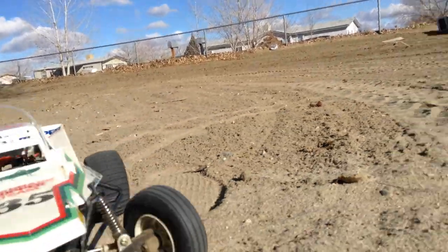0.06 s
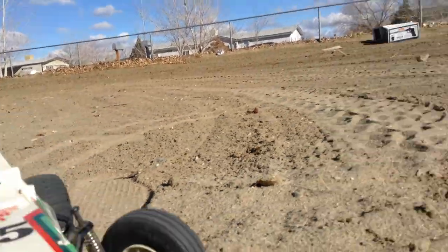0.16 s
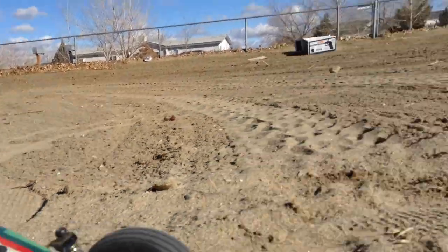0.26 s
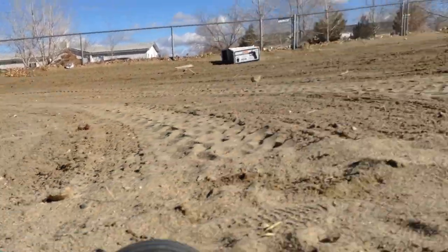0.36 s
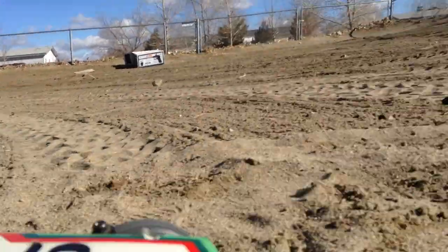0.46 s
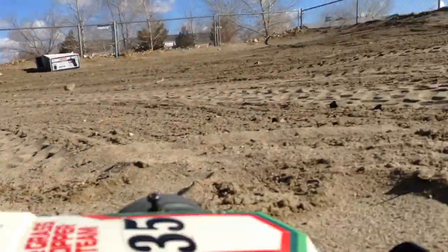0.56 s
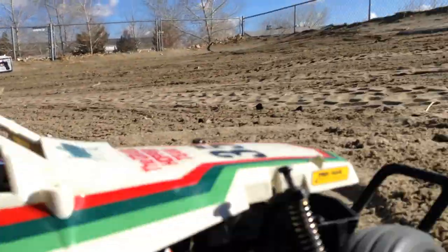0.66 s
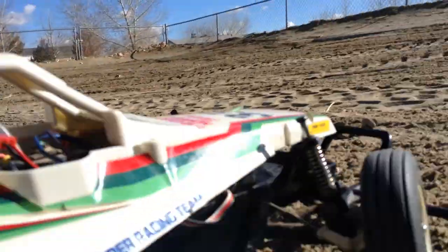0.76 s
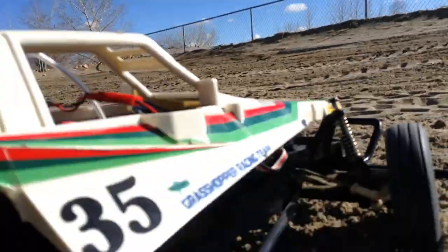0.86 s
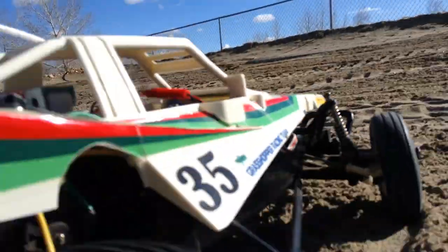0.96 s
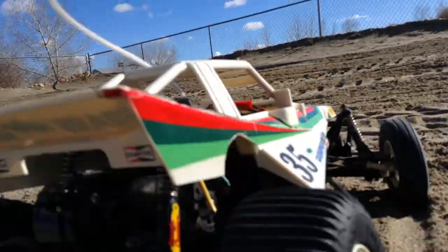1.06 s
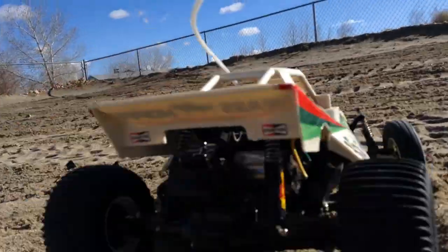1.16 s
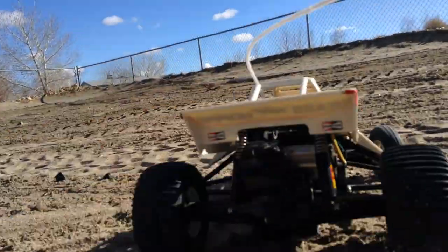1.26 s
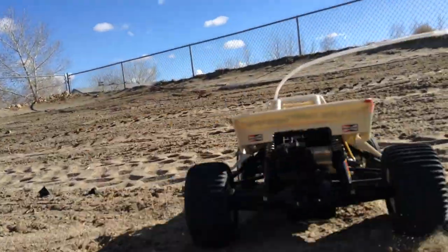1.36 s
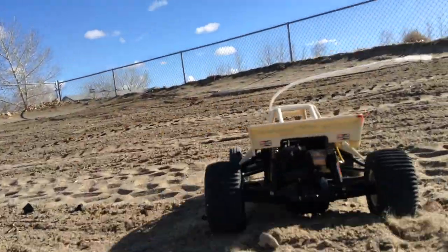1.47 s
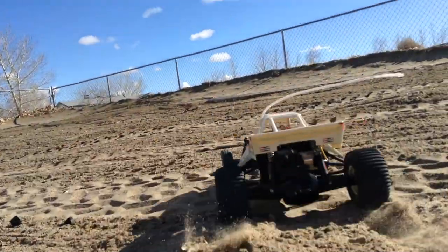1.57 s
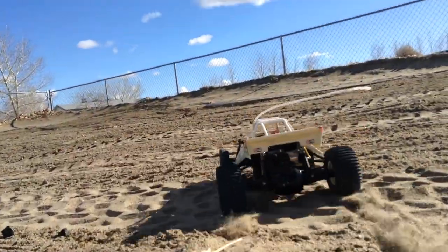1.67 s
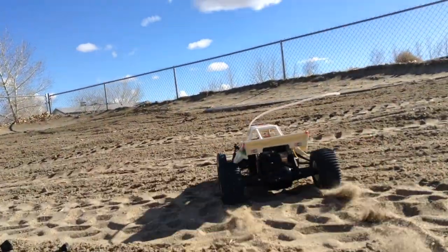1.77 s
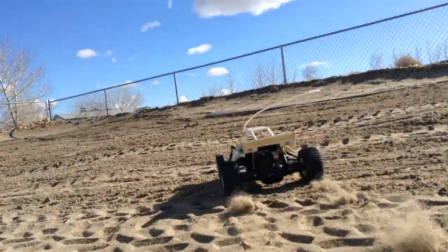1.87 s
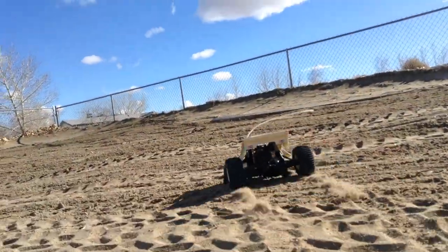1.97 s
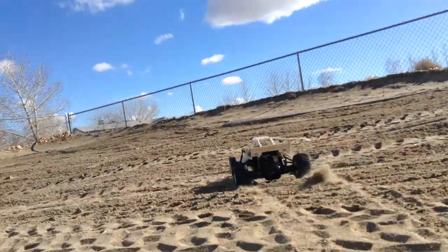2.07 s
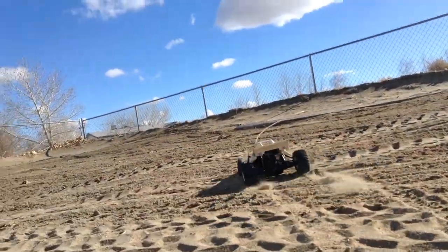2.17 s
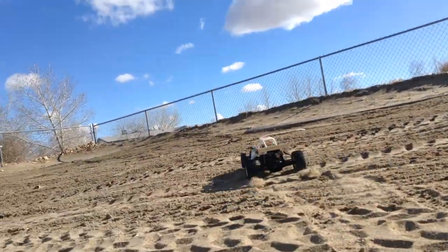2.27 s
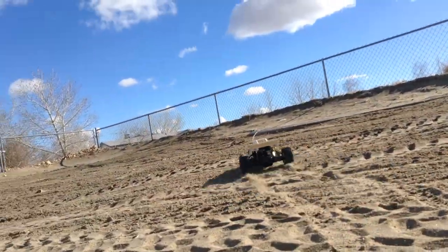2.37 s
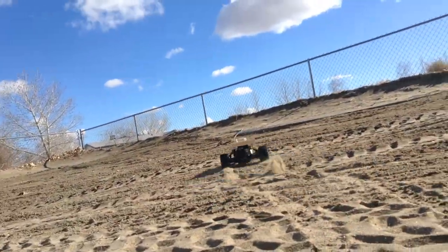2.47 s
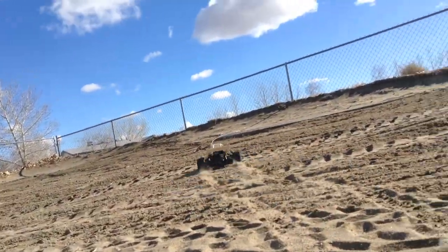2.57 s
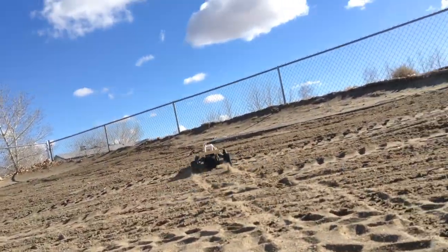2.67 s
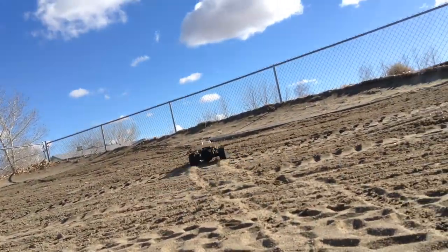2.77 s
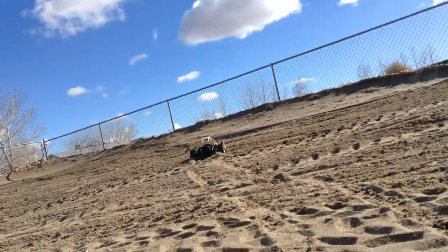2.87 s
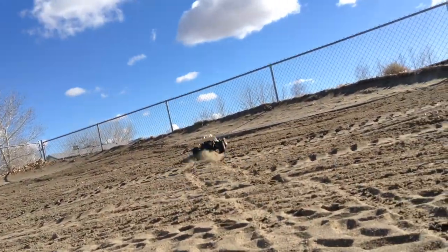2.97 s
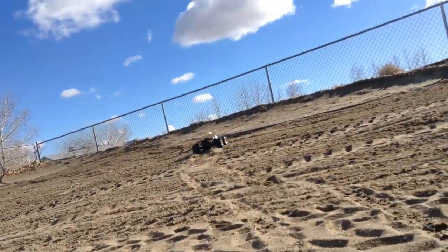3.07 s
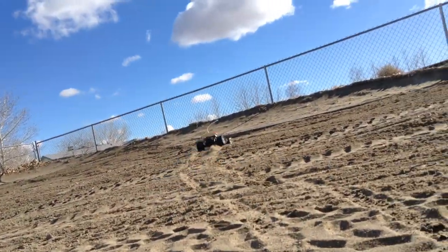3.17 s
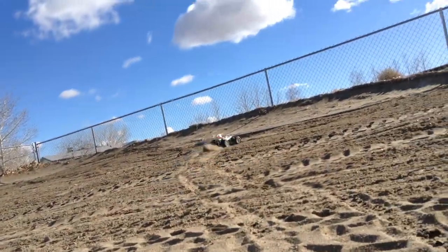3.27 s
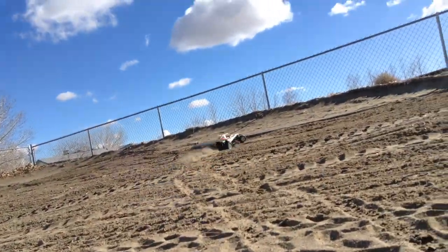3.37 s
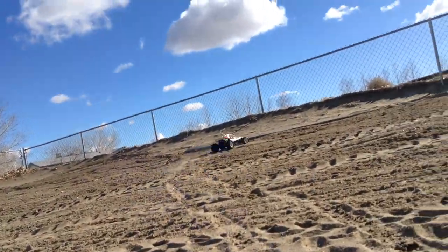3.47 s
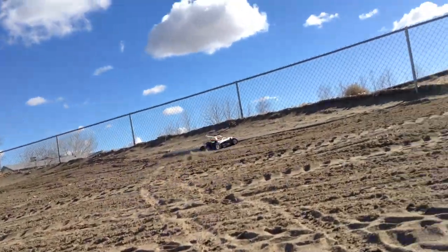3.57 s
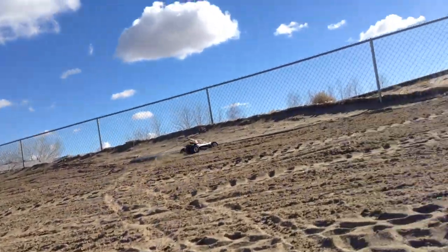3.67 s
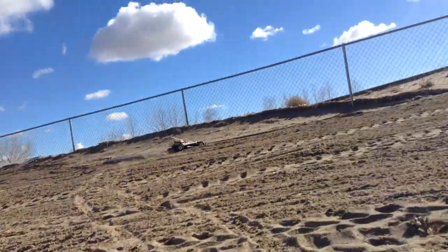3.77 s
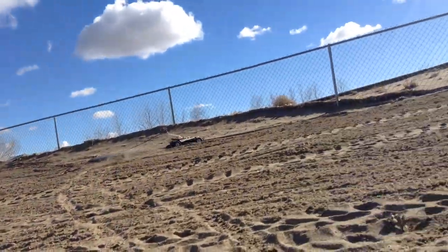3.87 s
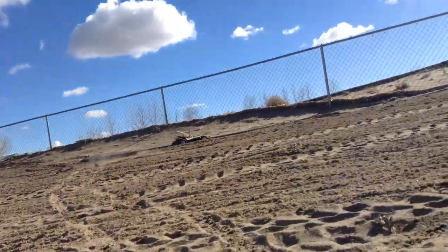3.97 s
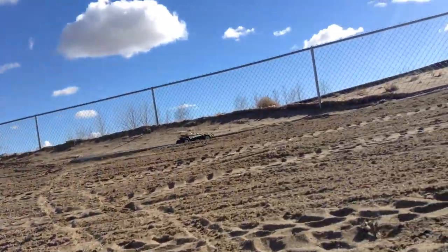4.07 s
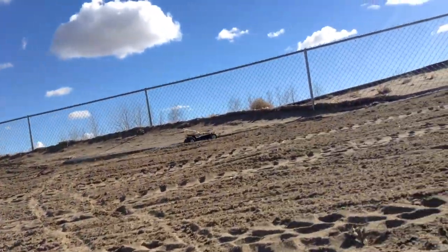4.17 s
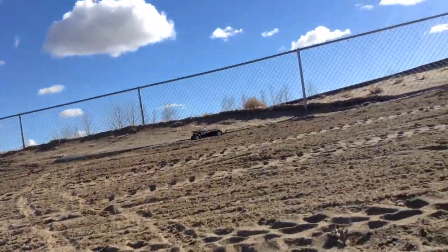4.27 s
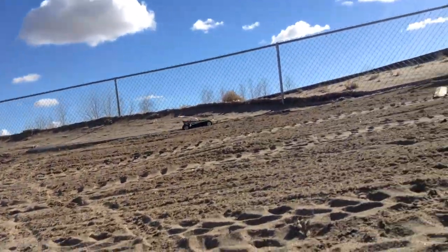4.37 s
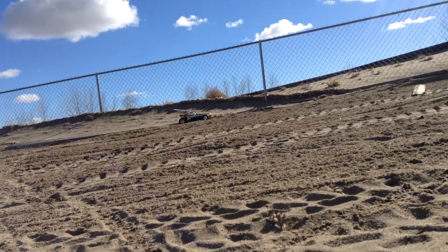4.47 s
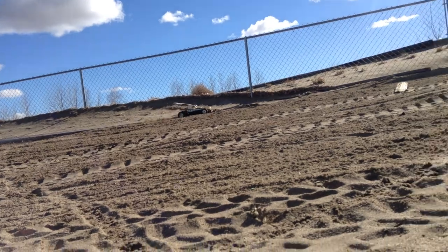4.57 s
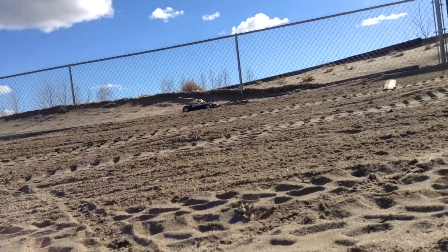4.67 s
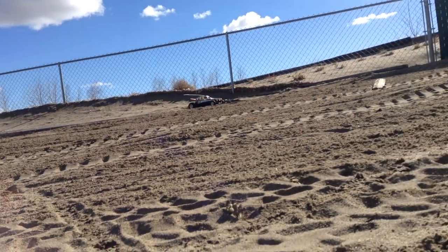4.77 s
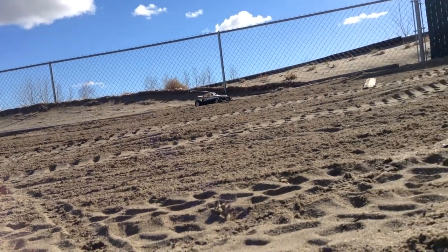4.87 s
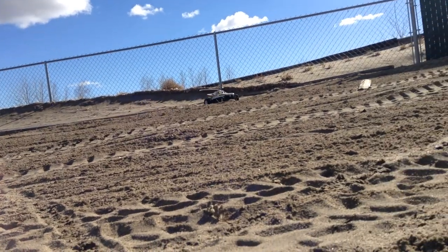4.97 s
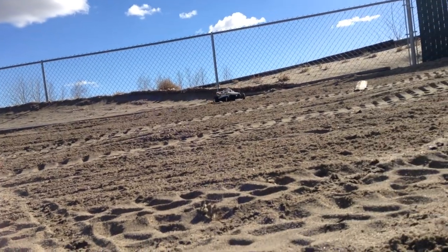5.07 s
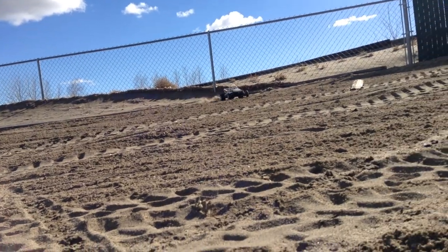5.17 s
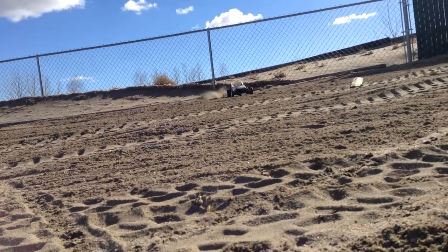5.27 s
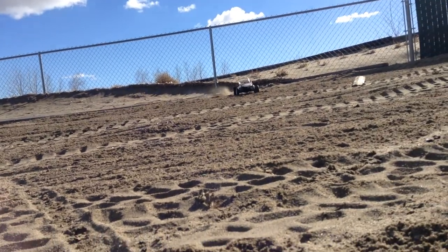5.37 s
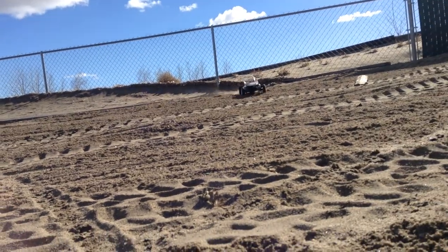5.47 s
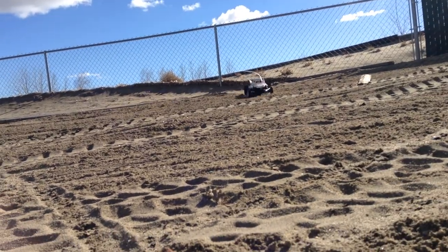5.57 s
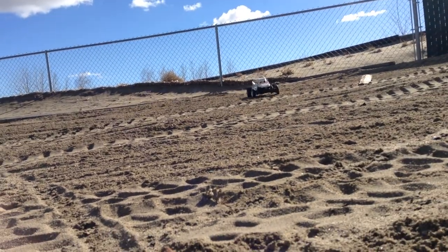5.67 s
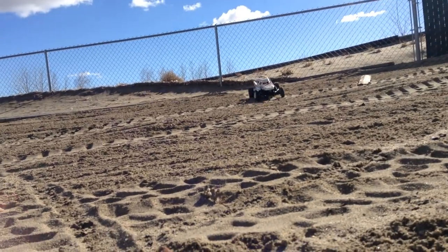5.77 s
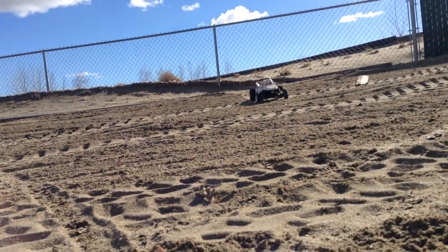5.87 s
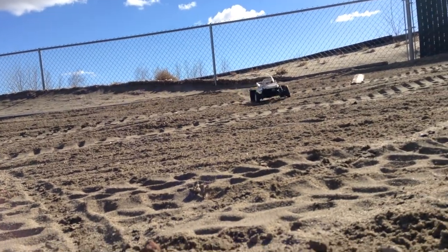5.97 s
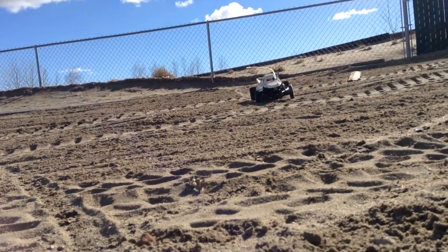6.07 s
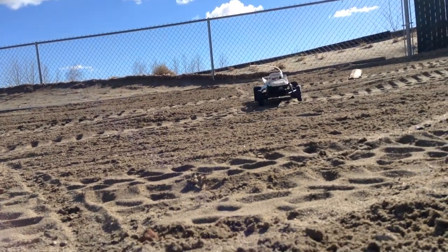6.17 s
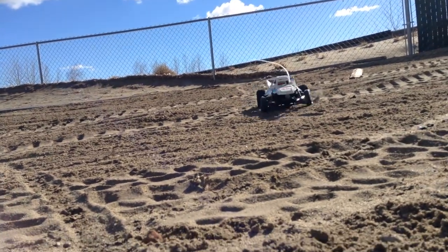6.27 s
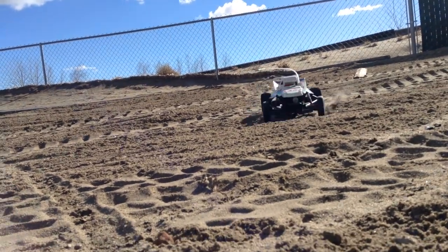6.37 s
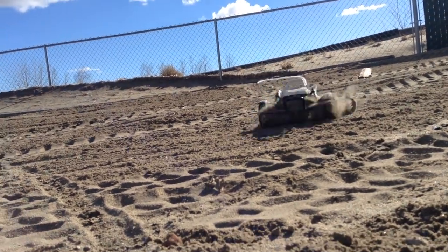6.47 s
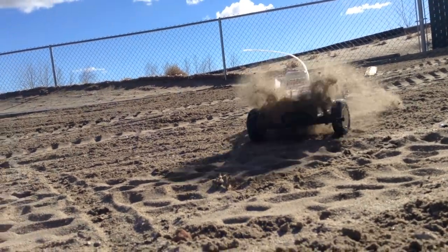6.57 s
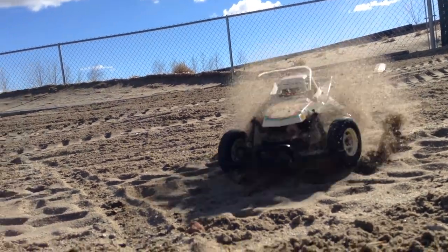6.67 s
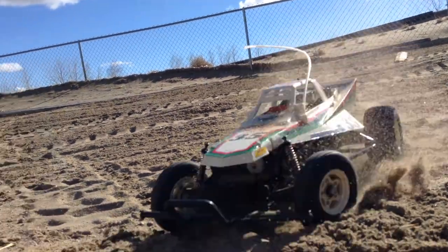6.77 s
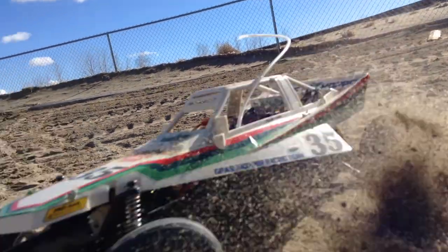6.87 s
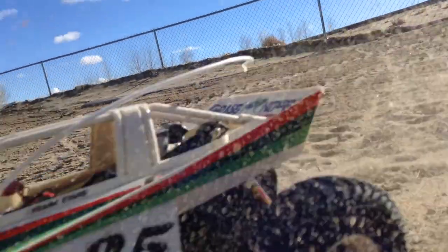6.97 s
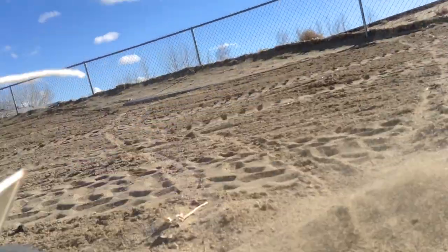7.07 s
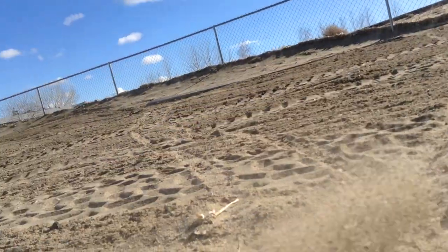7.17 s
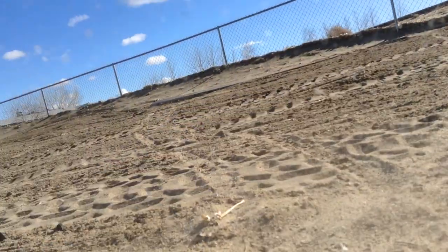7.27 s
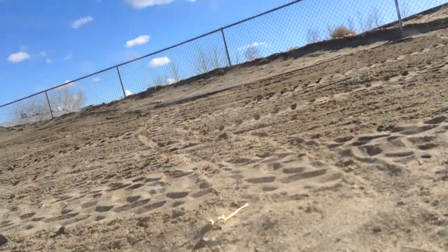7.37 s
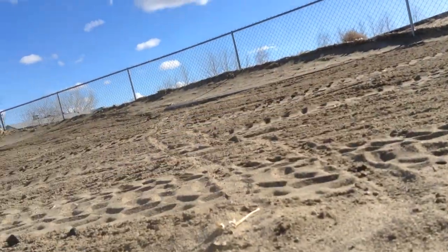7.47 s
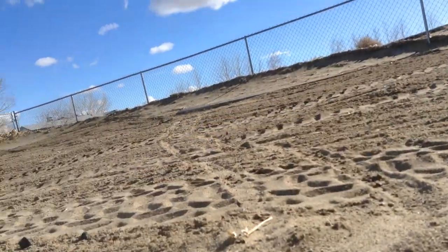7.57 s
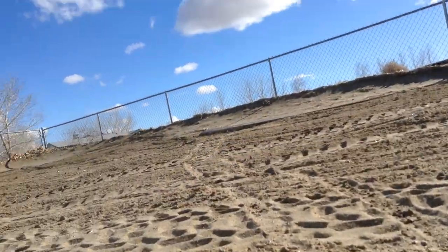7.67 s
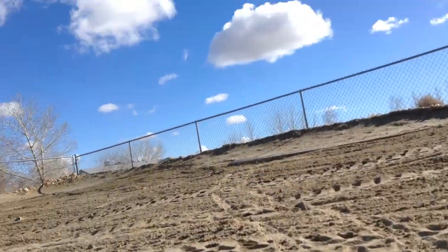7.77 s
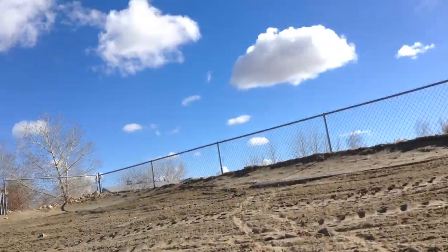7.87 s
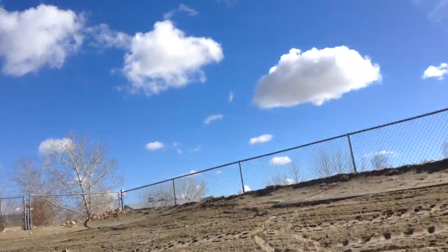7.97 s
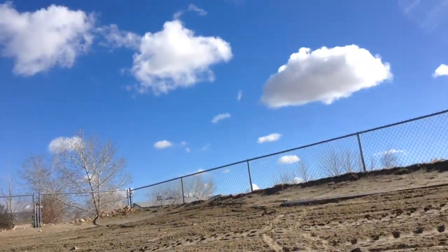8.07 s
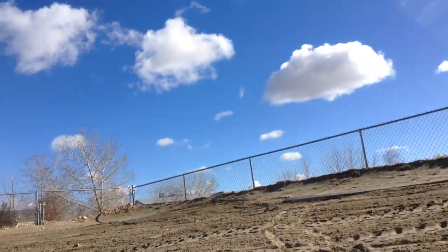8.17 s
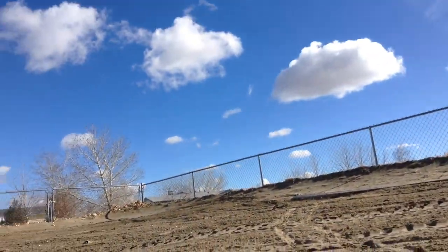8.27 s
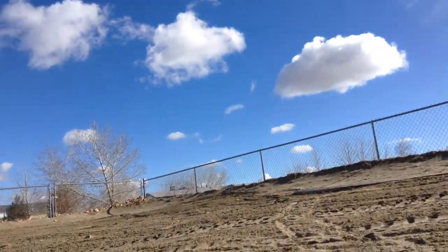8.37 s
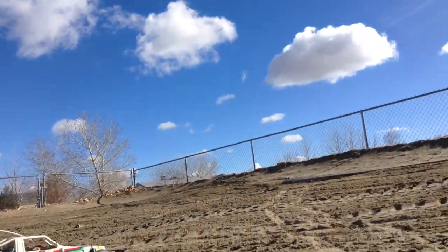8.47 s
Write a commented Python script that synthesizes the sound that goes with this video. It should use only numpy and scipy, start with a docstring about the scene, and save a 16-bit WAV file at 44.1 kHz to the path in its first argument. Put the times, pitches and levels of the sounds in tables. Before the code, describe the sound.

A remote-controlled toy buggy crawls near the microphone in an open dirt yard, its electric motor and gears whirring unevenly. It grows loud around 1 second, with a few plastic knocks, and by 2 seconds has climbed to a high whine. The pitch wavers constantly, jumping over bumps and dragging down as the tyres bite, with brief sharp chirps. Sand hisses from the tyres and the plastic chassis patters. From 2 seconds the buggy recedes, staying faint and distant from about 4 to 5.5 seconds. It then approaches quickly and tears past at about 7 seconds, loud and bright, with coarse sand pelting the body, two sharp knocks and a brief low puff of wind on the microphone. The whine drops slightly in pitch and falls away, still running at about 8.5 seconds. Faint, steady outdoor air lies underneath throughout.

```python
"""Radio-controlled buggy in a dirt yard.

It pulls away beside the microphone, hops round the yard, tears past again and runs on behind.
The gearbox whines with motor speed: the wheels spin up over each bump and are dragged down as they bite.
Tyres throw sand, the plastic chassis rattles and knocks, and a little wind touches the microphone."""
import sys
import numpy as np
from scipy import signal
from scipy.fft import rfft, irfft, next_fast_len
from scipy.io import wavfile
from scipy.ndimage import uniform_filter1d

SR = 44100
rng = np.random.default_rng(int(sys.argv[2]) if len(sys.argv) > 2 else 0)


def store_wav(level_fs):
    """Save 16-bit WAV to argv[1]."""
    pcm = np.round(np.clip(np.atleast_2d(level_fs), -1, 1) * 32767)
    wavfile.write(sys.argv[1], SR, pcm.T.astype(np.int16))


N = 375732
TIME_S = np.arange(N) / SR
FULL_SPEED_HZ, FREE_SPIN_HZ = 1700, 1994   # gear mesh rates
CUTOFF_HZ = 15400

# Landings, crawl then full throttle: t/s, mesh f/Hz on landing, mesh f/Hz dragged down, slam level/dB
LANDINGS = [(0.0, 710.0, 695.0, -33), (0.073, 1086, 946.0, -6), (0.126, 937, 695.0, -27),
            (0.275, 1067, 692.0, -10), (0.329, 867, 684.0, -22), (0.407, 981, 793.0, -10),
            (0.467, 1059, 601.0, -14), (0.575, 900.8, 678.0, -20.0), (0.635, 999, 749.0, -11),
            (0.7, 914.5, 525.0, -20.0), (0.79, 1090, 658.0, 2), (0.85, 898.5, 580.0, -4),
            (0.999, 796.0, 554.0, -20.0), (1.084, 978, 854.0, -20.0), (1.226, 990.4, 836.0, -25),
            (1.305, 1240.0, 994.0, -5), (1.389, 1227, 972.0, -26), (1.484, 1119, 1007.0, -20.0),
            (1.592, 1684, 1490.0, -20.0), (1.682, 1659, 1232.0, -4), (1.742, 1737, 1515.0, -9),
            (1.845, 2072, 1282.0, -25), (1.976, 1957.0, 1523.0, -15), (2.029, 1747, 1502.0, -17.0),
            (2.101, 2018, 1674.0, -23), (2.191, 2064.0, 1303.0, -17), (2.371, 1863, 1446.0, -10.0),
            (2.454, 2187, 1455.0, -9), (2.543, 2022.0, 1638.0, -18), (2.646, 2054, 1501.0, -5),
            (2.747, 1834, 1462.0, -21), (2.838, 1986, 1549.0, -12.0), (2.944, 2296, 1658.0, -5.0),
            (3.018, 1900, 1274.0, -20.0), (3.119, 2080, 1658.0, -1), (3.196, 2209.0, 1624.0, 4),
            (3.303, 2274, 1820.0, -23), (3.4, 1968, 1371.0, -23), (3.478, 1771, 1575.0, -26),
            (3.879, 2002.0, 1539.0, -3.0), (3.993, 2030, 1287.0, -27), (4.076, 1950, 1429.0, 9.5),
            (4.287, 1994.0, 1378.0, -22), (4.37, 2096, 1498.0, 1), (4.753, 1907, 1558.0, -17),
            (4.831, 1980, 1549.0, -10.0), (5.123, 1813.0, 1635.0, -2), (5.394, 1868, 1535.0, -19),
            (5.567, 1910, 1448.0, -13.0), (5.68, 2000, 1645.0, -4), (5.789, 1900, 1438.0, -22),
            (5.945, 1991.0, 1595.0, -8.0), (6.016, 2217, 1565.0, -20.0), (6.376, 2130, 1750.0, -2),
            (6.536, 2410.0, 1530.0, -23), (6.729, 2452, 1838.0, -12), (6.843, 2186.0, 1771.0, -9),
            (7.191, 2102, 1688.0, 0), (7.351, 2102.0, 1781.0, -10), (7.435, 2383, 2004.0, -22),
            (7.787, 1679, 1509.0, -25), (7.878, 1835, 1561.0, 1), (8.183, 1636, 1414.0, -9),
            (8.357, 1953, 1258.0, -9), (8.446, 1625.0, 1335.0, -10)]
# Hardest tyre skips: t/s, chirp level/dB re whine
HARD_SKIPS = [(0.634, 2), (1.971, 4.5), (2.026, 10), (2.346, 13), (3.126, 14.5), (3.559, 11.5), (4.379, 5),
              (6.215, 9), (6.67, 11), (6.901, -3), (7.05, 8), (7.213, 7), (8.184, 0), (8.341, 3.5)]
# Route: t/s, distance/m, directivity level/dB
ROUTE = [(0.0, 1.02, -2), (0.5, 0.6, -3), (0.82, 0.35, -3), (1.029, 0.38, -5), (1.21, 0.41, 2.5),
         (1.449, 0.56, -1.5), (1.68, 0.68, -0.5), (1.999, 1.19, -1), (2.3, 1.95, -1), (3.85, 7.73, -1),
         (3.951, 6.9, -7), (5.0, 13.4, 3.5), (5.798, 5.9, -3.5), (6.55, 1.69, -9), (6.92, 0.58, -5.5),
         (7.2, 0.82, -2.5), (7.85, 1.29, -9.5), (8.52, 2.81, 4.5)]
# Ground under the tyres: t/s, sand level/dB, patter level/dB, bumpiness (1 = usual)
TERRAIN = [(0.0, -8, 6, 1.02), (1.0, 7, 2, 0.46), (1.2, 8.5, -7.5, 0.48), (1.9, 10.5, 0.5, 1.12),
           (3.86, 13, 6, 0.811), (3.95, 5, 5.5, 0.898), (5.1, 6.5, 7, 1.02), (5.7, 9, 9, 1.742),
           (7.15, 8.5, 7.5, 1.23), (7.8, 8, 6.5, 0.84), (8.4, 3, 9, 0.7)]
# Chassis knocks and one sharp spit of sand (2.945 s): t/s, crack level/dB, thud level/dB
KNOCKS_AND_SPIT = [(1.045, -33, -26), (1.053, -5.5, -26), (1.083, -26, -24), (1.5994, -12, -24),
                   (2.945, -15, -68), (7.1293, -12, -20), (7.3164, -14, -24), (8.221, -39, -36)]
# Wind on the microphone: t/s, half-width/s, level/dB
WIND_PUFFS = [(3.429, 0.11, -58), (3.67, 0.076, -62), (5.234, 0.046, -61), (6.75, 0.078, -53),
              (6.956, 0.0092, -28)]
# Gearbox radiation: f/Hz, level/dB
GEARBOX_SPECTRUM = [(300, -27.5), (520, -18), (830, -13), (1150, -19.5), (1450, -6.5), (1850, -1.5),
                    (2350, -2.5), (2900, -15), (3900, -3), (5000, 6), (6100, 11.5), (7400, 4.5), (8800, -4),
                    (11000, -6), (15000, -70)]
# Flung sand: f/Hz, level/dB
SAND_SPECTRUM = [(800, -19.5), (2000, -5.5), (3000, -15.5), (4500, -3.5), (6500, 8), (8500, 0.5),
                 (11000, -1), (15500, -15)]
# Plastic body: f/Hz, level/dB
CHASSIS_SPECTRUM = [(130, -9.5), (220, -1.5), (400, 0.5), (560, 9), (900, 5.5), (1400, 5), (4500, 2.5),
                    (14000, -6.5)]
# Outdoor background: f/Hz, level/dB
AIR_SPECTRUM = [(120, -14.5), (190, 4.5), (320, -23), (600, 5.5), (900, -5.5), (2500, -17), (8000, 3.5),
                (15000, -38)]


def gearbox(mesh_hz, load, slam, whine_db, hum_db, split_hz=3100):
    """The case hums low, the teeth whine high; load lifts both, a slam makes the teeth squeal."""
    whine_load_db, hum_load_db, shake_db = 4.5, 1.5, 1.6
    speed = mesh_hz / mesh_hz.mean()
    strain = load * np.minimum(speed, 1) ** 2   # little load at a crawl
    mesh = gear_teeth(mesh_hz) * speed * from_db(shake_db * drift(220))
    lows = signal.sosfiltfilt(butter(4, split_hz), mesh)
    squeal = case_ring(mesh - lows)
    whine = levelled(squeal * from_db(whine_load_db * strain), window_s=.27) * from_db(whine_db)
    hum = levelled(lows * from_db(hum_load_db * strain), window_s=.22) * from_db(hum_db)
    grip = np.minimum(FREE_SPIN_HZ / mesh_hz, 1) ** 3   # free-spinning teeth fall quiet
    sound = grip * (hum + whine) + slam * levelled(squeal, window_s=.034)
    return signal.sosfilt(butter(2, 300, "high"), sound)   # case too small to radiate bass


def gear_teeth(mesh_hz, backlash_teeth=.009, flicker_db=4.2, rasp_db=-19):
    """Tooth impacts: harmonics and shaft tones, jittered by backlash, plus a rasp once per tooth."""
    _, patter_db, _ = per_sample(TERRAIN)
    shake = np.tanh(from_db(patter_db) * (mesh_hz / FULL_SPEED_HZ) ** 3)   # clods shake the gears
    slack = FULL_SPEED_HZ / mesh_hz   # slow gears run loose
    phase_teeth = np.cumsum(mesh_hz) / SR + backlash_teeth * (slack + shake / 2) * drift(260)
    fray_rad = .3 * shake + .65 * np.maximum(slack - 1, 0)
    shaft_orders = [(1 / 3, -4), (2 / 3, -8)]
    mesh_orders = [(k, np.log2(k)) for k in range(1, 13)]
    tone = np.zeros(N)
    for order, level_db in shaft_orders + mesh_orders:
        f_hz = order * mesh_hz
        radiated = gain_at(GEARBOX_SPECTRUM, f_hz) * (f_hz < CUTOFF_HZ)
        gain = radiated * from_db(level_db + flicker_db * drift(45))
        phase_rad = 2 * np.pi * (order * phase_teeth + rng.random())
        jitter_rad = fray_rad * np.minimum(f_hz / 4200, 1) ** 2 * drift(240)
        tone += gain * np.sin(phase_rad + jitter_rad)
    contact = 1 + np.cos(2 * np.pi * phase_teeth)
    rasp = coloured(rng.standard_normal(N) * contact, GEARBOX_SPECTRUM)
    return levelled(tone) + from_db(rasp_db) * np.sqrt(slack) * rasp


def case_ring(x, decay_s=.003, ring_db=-10):
    """Short modes of the plastic case: gliding tones flare and break as they sweep through."""
    tail = rng.standard_normal(int(.02 * SR))
    tail *= np.exp(-np.arange(len(tail)) / SR / decay_s)
    return x + from_db(ring_db) * signal.oaconvolve(x, tail / np.linalg.norm(tail))[:N]


def motor():
    """Mesh rate, tooth load (-1 spinning up, 1 dragged down) and chirp envelope."""
    hop_hz = hopping()
    log_spin, chirp = skipping(hop_hz)
    mesh_hz = hop_hz * np.exp(log_spin)
    slowing_per_s = -np.gradient(np.log(mesh_hz)) * SR
    load = np.tanh(lag(slowing_per_s, tau_s=.002) / 9)
    return mesh_hz, load, chirp


def hopping(bite_s=.032, recover_s=.05, recover_share=.57, inertia_s=.01):
    """Mesh rate: dragged down as the tyres bite, partly regained, then wound up to the next landing."""
    land_s, top_hz, low_hz, _ = np.transpose(LANDINGS)
    bitten_s = land_s + bite_s
    next_land_s = np.r_[land_s[1:], TIME_S[-1] + recover_s]
    next_top_hz = np.r_[top_hz[1:], top_hz[-1]]
    run_s = np.maximum(next_land_s - bitten_s, 1 / SR)
    recovered_s = bitten_s + np.minimum(recover_s, run_s / 2)
    recovered_hz = low_hz + recover_share * (next_top_hz - low_hz)
    knots_s = np.c_[land_s, bitten_s, recovered_s].ravel()
    knots_hz = np.c_[top_hz, low_hz, recovered_hz].ravel()
    return moving_mean(np.interp(TIME_S, knots_s, knots_hz), inertia_s)


def skipping(hop_hz, gap_s=(.01, .042), rise_s=.004, fall_s=.008, chirp_s=.006, spin_depth=.17):
    """Tyres skip between clods, harder at speed: the wheels spin up, the teeth chirp at each catch."""
    *_, bumpiness = per_sample(TERRAIN)
    gap_draws, size_draws = rng.random((600, 2)).T
    skip_s = np.cumsum(np.interp(gap_draws, [0, 1], gap_s))
    inside = skip_s < TIME_S[-1]
    skip_s, size_db = skip_s[inside], -10 * size_draws[inside]
    hard_s, hard_db = np.transpose(HARD_SKIPS)
    pace = np.minimum(hop_hz / FULL_SPEED_HZ, 1) ** 2
    light_spin = decays(skip_s, size_db, fall_s) * np.sqrt(bumpiness)
    hard_spin = decays(hard_s, 0, fall_s)
    spin = moving_mean(pace * np.maximum(light_spin, hard_spin), rise_s)
    chirp = pace * decays(skip_s, size_db - 3, chirp_s) + decays(hard_s, hard_db, chirp_s)
    return spin_depth * (spin - moving_mean(spin, window_s=.5)), chirp


def tooth_slam(chirp, rise_s=.0015, decay_s=.011, boost_db=3):
    """Envelope of the teeth slamming at landings and skips, relative to the whine."""
    land_s, _, _, slam_db = np.transpose(LANDINGS)
    return lag(decays(land_s, slam_db + boost_db, decay_s) + chirp, rise_s)


def levels_db(mesh_hz):
    """Hum, whine, sand, patter: all fall with distance; whine and sand follow speed and heading."""
    decades, aim_db = per_sample([(t_s, np.log10(range_m), db) for t_s, range_m, db in ROUTE])
    loose_db, cloddy_db, _ = per_sample(TERRAIN)
    speed_oct = np.log2(moving_mean(mesh_hz, window_s=.4) / FULL_SPEED_HZ)
    range_db = -24.5 * decades
    hum_db = -31 + range_db + .6 * np.maximum(-speed_oct, 0)   # a labouring motor hums louder
    whine_db = -22 + range_db + aim_db + 9 * speed_oct
    sand_db = -32.5 + range_db + aim_db + 15.5 * speed_oct + loose_db
    patter_db = -42.5 - 21 * decades + cloddy_db   # lows carry further over the ground
    return hum_db, whine_db, sand_db, patter_db


def sand_spray(load, bite_db=2.6, spurt_db=3):
    """Tyres fling grit in spurts as they dig in."""
    spray = coloured(grains(rate_hz=14000, spread_db=5.5), SAND_SPECTRUM)
    return levelled(spray * from_db(bite_db * load + spurt_db * drift(32)), window_s=.62)


def chassis_patter(load, bite_db=1, bounce_db=3.8):
    """Tyres patter on clods and shake the plastic body."""
    patter = coloured(grains(rate_hz=1800, spread_db=1.5), CHASSIS_SPECTRUM)
    return levelled(patter * from_db(bite_db * load + bounce_db * drift(11)), window_s=.14)


def knocks_and_spit(thud_s=.0088, crack_s=.004):
    """Chassis knocks and one sharp spit of sand: a gritty crack, usually on a short thud."""
    t_s, crack_db, thud_db = np.transpose(KNOCKS_AND_SPIT)
    thud = decays(t_s, thud_db + 5, thud_s) * coloured(rng.standard_normal(N), CHASSIS_SPECTRUM)
    crack = decays(t_s, crack_db - 4, crack_s) * coloured(rng.standard_normal(N), SAND_SPECTRUM)
    return signal.sosfilt(butter(2, 220, "high"), thud + crack)   # light body, no boom


def sand_shower(centre_s=7.07, half_width_s=.24, level_db=-23, band_hz=(1900, 5000)):
    """Coarse sand pelts the plastic body on the close pass."""
    shower = signal.sosfilt(butter(2, band_hz, "band"), grains(rate_hz=1600, spread_db=2))
    return swell(centre_s, half_width_s, level_db) * unit_rms(shower)


def wind(band_hz=(125, 280)):
    """Soft low puffs on the microphone, strongest as the buggy brushes past."""
    rumble = signal.sosfilt(butter(2, band_hz, "band"), rng.standard_normal(N))
    return sum(swell(*puff) for puff in WIND_PUFFS) * unit_rms(rumble)


def outdoor_air(level_db=-54):
    """Faint steady background noise."""
    return from_db(level_db) * coloured(rng.standard_normal(N), AIR_SPECTRUM)


def from_db(db):
    """Decibels to gain."""
    return 10 ** (np.asarray(db) / 20)


def unit_rms(x):
    """Scale to rms 1."""
    return x / np.sqrt(np.mean(x ** 2) + 1e-20)


def butter(order, edge_hz, kind="low"):
    """Butterworth sections."""
    return signal.butter(order, edge_hz, kind, fs=SR, output="sos")


def per_sample(rows):
    """Interpolate a table's columns over time."""
    t_s, *columns = np.transpose(rows)
    return [np.interp(TIME_S, t_s, column) for column in columns]


def gain_at(spectrum, f_hz):
    """Spectrum gain, interpolated in log frequency."""
    points_hz, level_db = np.transpose(spectrum)
    return from_db(np.interp(np.log(f_hz + 1e-9), np.log(points_hz), level_db))


def coloured(x, spectrum):
    """Apply a spectrum, rolled off below its first point; rms 1."""
    size = next_fast_len(N)
    f_hz = np.arange(size // 2 + 1) * SR / size
    skirt = np.minimum(f_hz / spectrum[0][0], 1) ** 2
    return unit_rms(irfft(rfft(x, size) * gain_at(spectrum, f_hz) * skirt, size)[:N])


def lag(x, tau_s):
    """One-pole low-pass."""
    pole = np.exp(-1 / (tau_s * SR))
    return signal.lfilter([1 - pole], [1, -pole], x + 1e-18)


def moving_mean(x, window_s):
    """Centred average."""
    return uniform_filter1d(x, int(window_s * SR))


def levelled(x, window_s=.074):
    """Hold the slow level at 1, keep the fast flutter."""
    return x / np.sqrt(np.abs(moving_mean(x ** 2, window_s)) + 1e-12)


def drift(corner_hz):
    """Smooth random wander; rms 1."""
    step, warmup = 16, 4000
    pole = np.exp(-2 * np.pi * corner_hz * step / SR)
    noise = rng.standard_normal(N // step + warmup + 2)
    slow = signal.lfilter([1], [1, -2 * pole, pole * pole], noise)[warmup:]
    return np.interp(np.arange(N) / step, np.arange(len(slow)), unit_rms(slow))


def grains(rate_hz, spread_db):
    """Random clicks, a few much larger than the rest."""
    sizes = from_db(spread_db * np.minimum(rng.exponential(1, N), 4))
    return (rng.random(N) < rate_hz / SR) * sizes * rng.choice([-1, 1], N)


def decays(t_s, level_db, decay_s):
    """Envelope that jumps at each hit and dies away."""
    hits = np.zeros(N)
    hits[(t_s * SR).astype(int)] = from_db(level_db)
    return lag(hits, decay_s) * decay_s * SR


def swell(centre_s, half_width_s, level_db):
    """Gaussian envelope."""
    return from_db(level_db) * np.exp(-((TIME_S - centre_s) / half_width_s) ** 2)


def scene(slam_sand_db=-13):
    """The buggy over quiet outdoor air, mono."""
    mesh_hz, load, chirp = motor()
    hum_db, whine_db, sand_db, patter_db = levels_db(mesh_hz)
    slam = from_db(whine_db) * tooth_slam(chirp)
    buggy = gearbox(mesh_hz, load, slam, whine_db, hum_db)
    buggy += (from_db(sand_db) + from_db(slam_sand_db) * slam) * sand_spray(load)
    buggy += from_db(patter_db) * chassis_patter(load) + knocks_and_spit() + sand_shower()
    return (buggy + outdoor_air() + wind())[None]


def record(dry, ceiling=.72, low_cut_hz=92):
    """Round the peaks; cut deep bass and top."""
    rounded = dry / (1 + (dry / ceiling) ** 8) ** (1 / 8)
    thin = signal.sosfilt(butter(4, low_cut_hz, "high"), rounded)
    return signal.sosfilt(signal.ellip(10, .1, 90, CUTOFF_HZ, fs=SR, output="sos"), thin)


dry = scene()
out = record(dry)
store_wav(out)
```